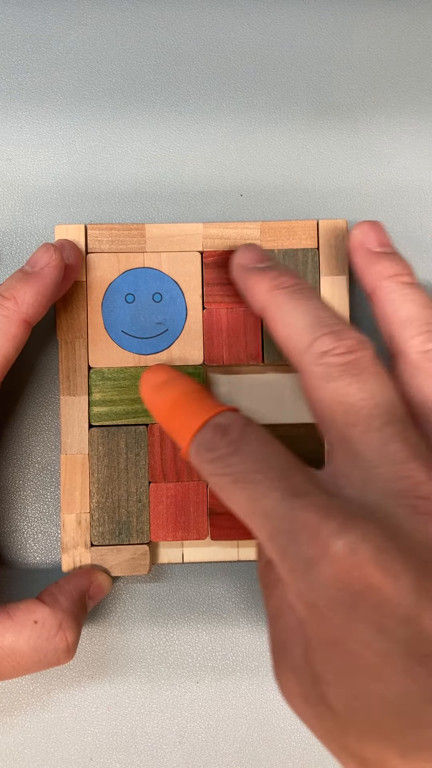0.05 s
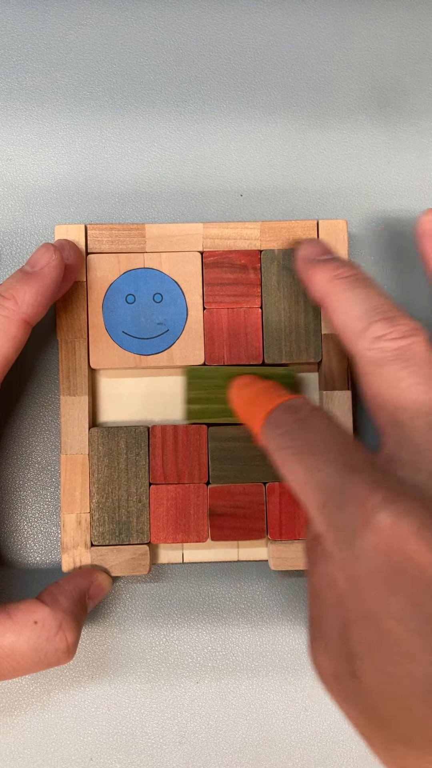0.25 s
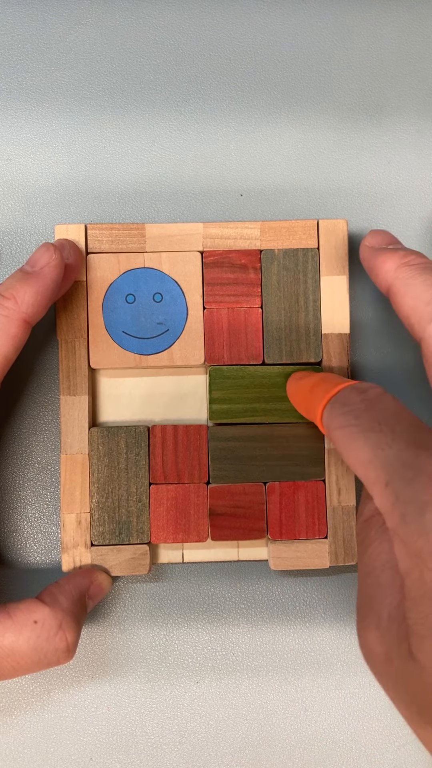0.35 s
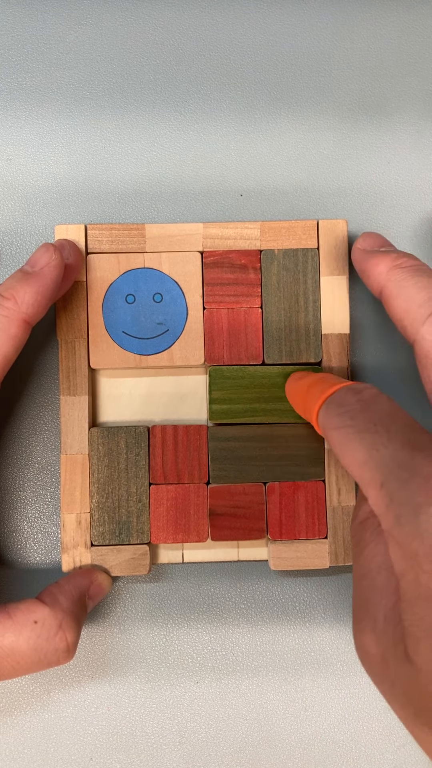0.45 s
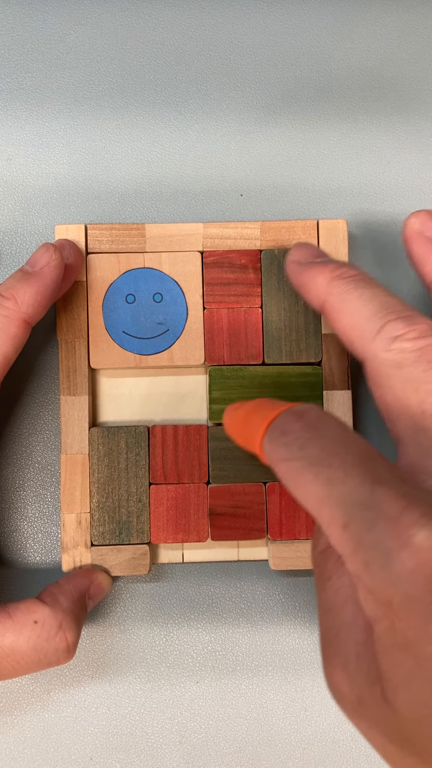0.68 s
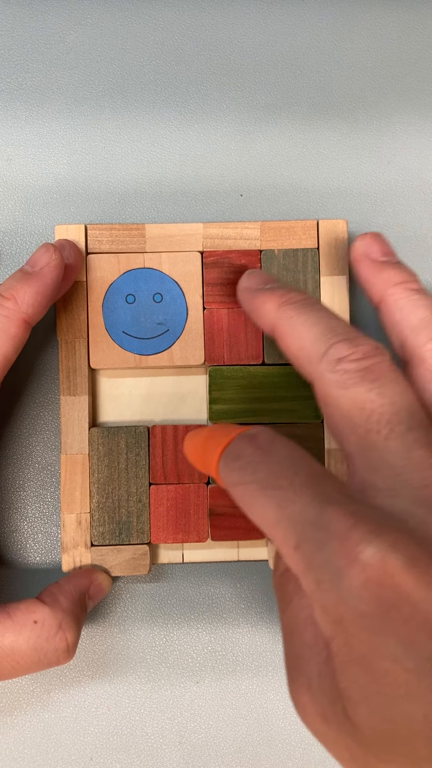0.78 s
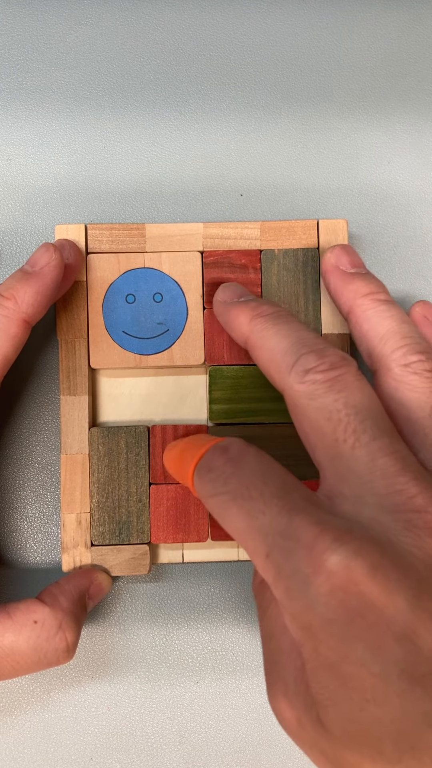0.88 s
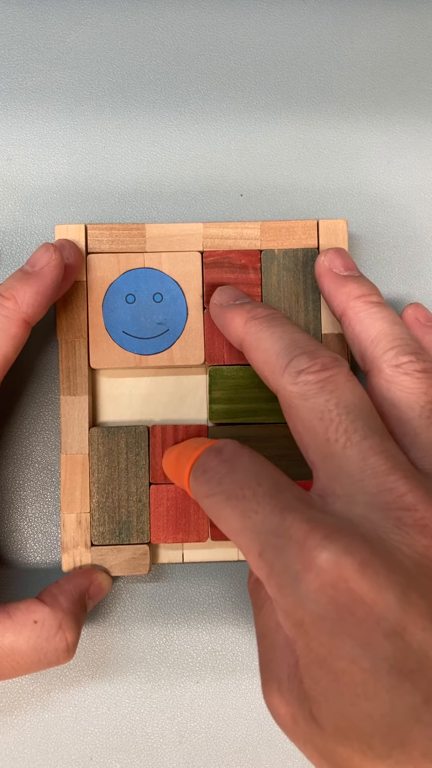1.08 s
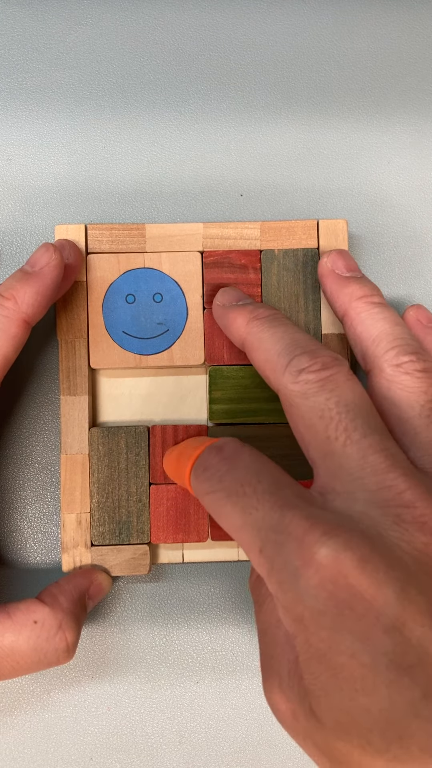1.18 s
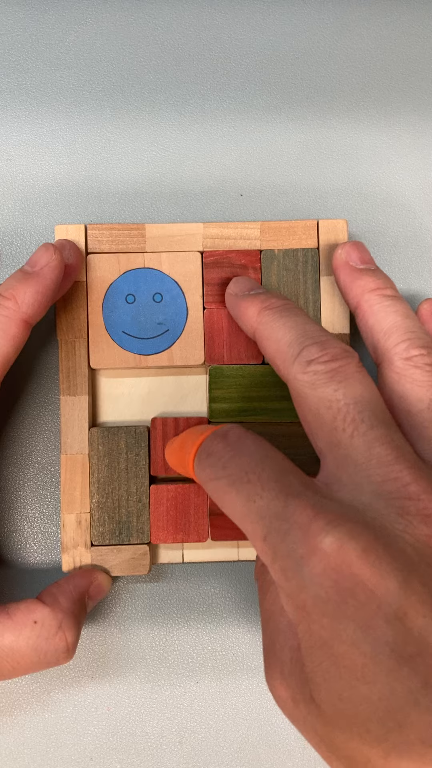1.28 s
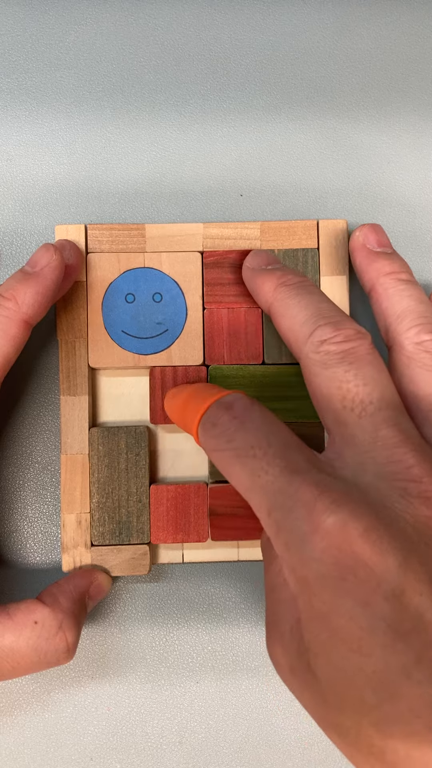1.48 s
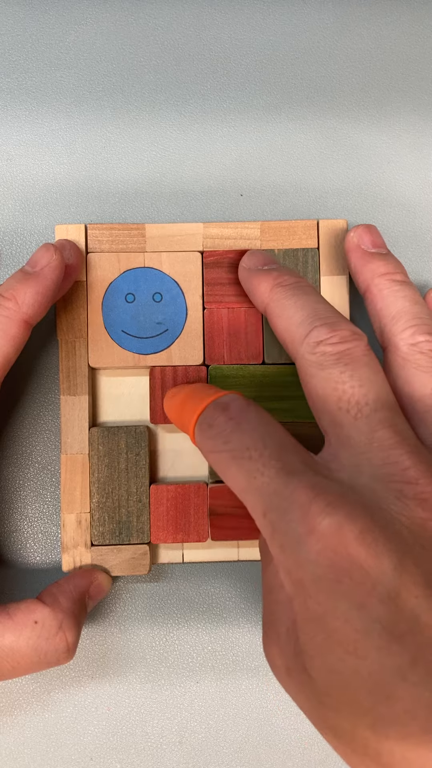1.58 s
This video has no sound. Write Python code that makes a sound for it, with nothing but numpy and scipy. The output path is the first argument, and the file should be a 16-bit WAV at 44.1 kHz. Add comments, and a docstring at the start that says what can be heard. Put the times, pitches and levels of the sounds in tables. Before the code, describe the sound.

Close to the microphone in a small room, a wooden puzzle block scrapes along its tray and clacks against the edge. After a pause with faint hand rustle, a second block slides and taps lightly against its neighbour.

```python
"""On a table in a small room, a finger slides two wooden blocks across a puzzle tray near two
microphone ports. Each block scrapes by stick-slip friction, countless tiny slips, and stops with a
clack as the impact excites its damped modes: the long one on the frame, the small one on a neighbour.
The room reverberates; beneath it all lie the noise of its air, a faint fan whine and a hand's rustle."""
import sys
import numpy as np
from scipy import signal
from scipy.fft import rfft, irfft, next_fast_len
from scipy.io import wavfile
from scipy.ndimage import map_coordinates

SR = 44100
rng = np.random.default_rng(int(sys.argv[2]) if len(sys.argv) > 2 else 0)


def put_to_file(sound):
    """Save the sound as 16-bit audio at rate SR, in the file named by the first command-line argument."""
    columns = np.atleast_2d(sound).T  # one column per channel
    safe = np.clip(columns, -1, 1)
    whole_steps = np.round(safe * 32767)
    wavfile.write(sys.argv[1], SR, whole_steps.astype(np.int16))


N = 72765

# spectra of the room air and the hand's rustle (frequency [Hz], relative level [dB])
AIR_SPECTRUM = [(20, -5), (45, 1.5), (70, 6), (120, 4), (200, -1), (300, -8), (550, -16.5), (800, -17),
                (1100, -20), (1400, -21), (2200, -23.5), (3000, -27), (5000, -27.5), (6500, -33),
                (8500, -27.5), (15000, -41.5)]
RUSTLE_SPECTRUM = [(200, -12.5), (800, 10), (2000, 1.5), (3000, -8.5), (5000, -14.5), (8000, -33.5),
                   (15000, -31)]
# likeness of the air noise at left and right (frequency [Hz], coherence [1])
AIR_COHERENCE = [(50, 1), (150, .7), (400, .3), (1500, .3), (8000, .3)]
# partials of the fan (frequency [Hz], level [dB])
FAN_PARTIALS = [(812, -90), (1023, -79), (1070, -78.5), (1123, -99)]
# course of the rustle as the hand moves (time [s], level [dB])
RUSTLE_ENVELOPE = [(0, -81), (.62, -82), (.82, -71.5), (1.05, -77.5), (1.25, -75), (1.65, -76.5)]
# modes of table, tray and both blocks (frequency [Hz], level [dB], decay time T60 [s])
TABLE_MODES = [(59.45, -49, .16), (119, -47.5, 0.13), (174, -58.5, .06)]
TRAY_MODES = [(197.4, -58.5, 0.035), (577.6, -63.5, 0.066)]
LONG_MODES = [(646, -13.5, 0.021), (999, -11, .012), (1545, -5, 0.019), (2110, -5, .01), (2710, -5, 0.0069),
              (3421, -12.5, 0.03), (4610, -10, .014), (5600, -7.5, 0.0021), (6800, -1, 0.0037),
              (8000, -8, 0.0054)]
SMALL_MODES = [(400, -32, .035), (602, -28, 0.045), (1155, -20, 0.023), (2370, -5, 0.0082),
               (2990, -1, 0.0075), (4450, -3, 0.0078), (5760, -4.5, 0.0027)]
# pushes: one for the long block, two nudges and a slide for the small one
# (start [s], end [s], level [dB], rise time [s], depth of the rise [dB])
LONG_PUSHES = [(.174, .311, -45.5, 0.071, 11.5)]
SMALL_PUSHES = [(1.236, 1.259, -65, 0.016, 5.5), (1.276, 1.299, -65, 0.005, 3.4),
                (1.334, 1.408, -48, 0.015, 15)]
# friction spectra of the sliding faces (frequency [Hz], relative level [dB])
LONG_GRAIN = [(100, -31.5), (400, -22), (600, -12), (1000, -9.5), (1550, -13.5), (2100, -0.5), (3200, -2),
              (4200, -5), (5700, 0), (6700, 2.5), (7800, -2), (9500, -3.5), (12000, -7), (15500, -12.5)]
SMALL_GRAIN = [(100, -26), (500, -36), (1000, -11.5), (1600, -15.5), (2000, 1.5), (2400, 3.5), (3100, -1),
               (4200, -9), (5900, 6.5), (7200, 0), (9000, -6.5), (11000, -5.5), (15500, -16)]
# contacts: long block on the frame (lead-in, two corners, rebound), small block on its neighbour
# (time [s], level [dB], low-pass cutoff [Hz])
LONG_CONTACTS = [(.3078, -37.5, 6000), (.3096, -42, 4000), (.3107, -20.5, 3840), (.3114, -20, 13000),
                 (.3199, -30, 3500)]
SMALL_CONTACTS = [(1.4058, -46.5, 9000), (1.4084, -33.5, 8900)]
# impact spectra, shared by rattle and snap (frequency [Hz], relative level [dB])
LONG_IMPACT_SPECTRUM = [(60, -21.5), (170, -4), (260, -11.5), (370, -8.5), (550, -7.5), (1000, -0.5),
                        (1550, 0.5), (2400, 0.5), (3300, -1.5), (4300, -6.5), (5700, 3), (7500, -4),
                        (10000, -14), (15000, -27.5)]
SMALL_IMPACT_SPECTRUM = [(100, -21), (380, 7), (750, -2), (1500, -2.5), (2400, 0), (3500, -6), (4700, -4.5),
                         (6500, -18), (10000, -8.5), (15000, -22)]
# phase between the ports (frequency [Hz], lead of the left [rad])
PORT_PHASE = [(0, 0), (600, -1), (1000, -.8), (2100, .45), (3400, .3), (4500, 1.8), (5600, 3.45),
              (7800, 5.55), (9200, 6.7), (10700, 8.6), (12500, 9.9), (14500, 12.2), (15750, 13)]
# balance between the ports (frequency [Hz], left minus right [dB])
PORT_BALANCE = [(500, 1), (1000, -3.5), (1500, -1.5), (2100, -11), (2800, -9), (3400, -6), (4400, -2),
                (5500, 0)]
# reverberation time (frequency [Hz], T60 [s])
ROOM_T60 = [(150, .35), (1000, .32), (4500, 0.29), (6500, .23), (14000, 0.46)]
# colour of the reflections (frequency [Hz], gain [dB])
ROOM_SPECTRUM = [(100, 2), (400, 5), (1000, 2.5), (1600, 2.5), (3000, 0), (4400, 4.5), (5900, -8.5),
                 (7500, -1.5), (9500, -9), (14000, -14)]

RING_SAMPLES = int(.25 * SR)  # length of an impulse response
RING_TIME = np.arange(RING_SAMPLES) / SR


def amp(db):
    """Amplitude ratio of a level in decibels."""
    return 10 ** (np.asarray(db) / 20)


def unit_rms(x):
    """Normalisation to rms 1."""
    return x / np.sqrt(np.mean(x ** 2) + 1e-20)


def along(points, hz):
    """Interpolation of (frequency, value) points on a logarithmic frequency axis."""
    knots_hz, values = np.transpose(points)
    return np.interp(np.log(hz + 1), np.log(knots_hz + 1), values)


def since(start_s):
    """Seconds elapsed since start_s, zero before."""
    return np.maximum(np.arange(N) / SR - start_s, 0)


def placed(x, start_s):
    """A short sound delayed to start_s in the scene."""
    out, i = np.zeros(x.shape[:-1] + (N,)), round(start_s * SR)
    out[..., i:i + x.shape[-1]] = x[..., :N - i]
    return out


def wobble(knots_per_s):
    """Smooth random modulation: a spline through Gaussian values."""
    knots = rng.standard_normal(int(N * knots_per_s / SR) + 4)
    return map_coordinates(knots, [np.arange(N) * knots_per_s / SR])


def filtered(x, response):
    """Linear filtering: the spectrum of x times a complex frequency response."""
    n = x.shape[-1]
    padded = next_fast_len(n + 2048, True)
    return irfft(rfft(x, padded) * response(np.fft.rfftfreq(padded, 1 / SR)), padded)[..., :n]


def coloured(x, spectrum):
    """Spectral shaping by (frequency [Hz], level [dB]) points, at rms 1."""
    return unit_rms(filtered(x, lambda hz: amp(along(spectrum, hz))))


def low_pass(ratio):
    """Two-pole Butterworth response; ratio is frequency over cutoff."""
    return 1 / (1 + np.sqrt(2) * 1j * ratio - ratio ** 2)


def ring(modes):
    """Modal superposition: a blow leaves damped sinusoids, here of alternating sign."""
    return sum((-1) ** k * amp(db - 60 * RING_TIME / t60) * np.sin(2 * np.pi * hz * RING_TIME)
               for k, (hz, db, t60) in enumerate(modes))


def room_air(level_db=-70):
    """Partially coherent noise: the two channels are most alike at long wavelengths."""
    def response(hz):
        angle = np.arccos(np.clip(along(AIR_COHERENCE, hz), -1, 1)) / 2
        return amp(along(AIR_SPECTRUM, hz)) * [np.cos(angle), np.sin(angle)]
    mid, side = filtered(rng.standard_normal((2, N)), response)
    return amp(level_db) * unit_rms(np.array([mid + side, mid - side]))


def fan_whine(waver_depth=.64, drift_hz=2.2):
    """Modulated tones: the partials drift together, and each wavers in amplitude and phase."""
    out = np.zeros((2, N))
    drift = drift_hz * wobble(20)
    for hz, db in FAN_PARTIALS:
        waver = 1 + waver_depth * (wobble(26) + 1j * np.array([wobble(22), wobble(22)]))
        carrier = np.exp(2j * np.pi * np.cumsum(hz + drift) / SR)
        out += np.sqrt(2) * amp(db) * np.real(waver * carrier)
    return out


def hand_rustle():
    """Amplitude-modulated noise: a soft rustle swells and fades as the hand moves."""
    level_db = np.interp(since(0), *np.transpose(RUSTLE_ENVELOPE))
    return coloured(rng.standard_normal((2, N)), RUSTLE_SPECTRUM) * amp(level_db)


def fingertip_touch(tick_s=.1385, tick_db=-68, tick_t60_s=.008, land_s=.1415, rise_s=.014):
    """Soft impact: a block ticks as it shifts under the fingertip; tray and table ring in their modes."""
    tick = coloured(rng.standard_normal(RING_SAMPLES),
                    [(500, -11.5), (4000, -12), (10500, -6.5), (15000, -10)])
    tick *= amp(tick_db - 60 * RING_TIME / tick_t60_s)
    thud = ring(TABLE_MODES) * (1 - np.exp(-RING_TIME / rise_s)) - ring(TRAY_MODES)
    return placed(tick, tick_s) + placed(thud, land_s)


def scrape(pushes, grain, slips_per_s=9000, scatter_db=1.5, judder_db=-.45,
           break_loose_s=.0011, stop_s=.0063, treble_hz=6000, treble_exponent=.35):
    """Stick-slip friction: dense tiny slips, louder and brighter as the block gathers speed."""
    slips = (rng.random(N) < slips_per_s / SR) * rng.standard_normal(N)
    slips *= amp(scatter_db * rng.standard_normal(N).clip(-2, 2))
    speed = np.zeros(N)
    for start, end, db, rise_s, depth_db in pushes:
        t = since(start)
        ramp = amp(db - depth_db * np.maximum(1 - t / rise_s, 0))
        speed += ramp * (1 - np.exp(-t / break_loose_s)) * np.exp(-since(end) / stop_s)
    rub = coloured(slips, grain)
    body = filtered(rub, lambda hz: 1 / (1 + (hz / treble_hz) ** 2) ** 2)
    treble = (rub - body) * (speed / speed.max()) ** treble_exponent
    return (body + treble) * speed * amp(judder_db * wobble(160))


def clack(contacts, modes, spectrum, rattle_db=-12, rattle_t60_s=.0277, bass_hz=483.3):
    """Impact excitation: each contact rings the block, jostles its neighbours and snaps into the room."""
    def radiation(hz):  # a small body radiates long wavelengths poorly
        return low_pass(hz / bass_hz) * -(hz / bass_hz) ** 2
    out, wood = np.zeros((2, N)), ring(modes)
    rattle_decay = amp(rattle_db - 60 * RING_TIME / rattle_t60_s)
    for time_s, db, cutoff_hz in contacts:
        rattle = coloured(rng.standard_normal(RING_SAMPLES), spectrum) * rattle_decay
        blow = rattle - wood
        snap = coloured(signal.unit_impulse(RING_SAMPLES, SR // 1000), spectrum) * blow.std()
        # each contact has its own cutoff, so it sounds dull or bright
        heard = filtered(ports(blow) + room(snap), lambda hz: low_pass(hz / cutoff_hz) * radiation(hz))
        out += amp(db) * placed(heard, time_s)
    return out


def ports(x):
    """Direct sound: it reaches the two ports with a phase and level that depend on frequency."""
    def response(hz):
        phase = np.interp(hz, *np.transpose(PORT_PHASE))
        left = np.exp(.5j * phase) * amp(along(PORT_BALANCE, hz) / 2)
        return np.array([left, 1 / left])
    return filtered(x, response)


def room(x, tail_db=-11, tail_rise_s=.008, early_db=-5, early_rise_s=.001, early_t60_s=.06):
    """Reverberation by convolution: early scatter from table and hands, then a decaying diffuse tail."""
    hz, frame_s, noise = signal.stft(rng.standard_normal((2, RING_SAMPLES)), SR, nperseg=256)
    decay = amp(-60 * frame_s / along(ROOM_T60, hz)[:, None])
    tail = signal.istft(noise * decay, SR, nperseg=256)[1]
    t = np.arange(tail.shape[1]) / SR
    tail *= 1 - np.exp(-t / tail_rise_s)
    early = rng.standard_normal(tail.shape) * amp(-60 * t / early_t60_s)
    early *= 1 - np.exp(-t / early_rise_s)
    tail *= amp(tail_db) / np.linalg.norm(tail[0])
    early *= amp(early_db) / np.linalg.norm(early[0])
    impulse_response = filtered(tail + early, lambda hz: amp(along(ROOM_SPECTRUM, hz)))
    return signal.fftconvolve(x[None], impulse_response, axes=1)[:, :len(x)]


def scene(lean_db=.77):
    """Superposition: direct and reflected sound of the blocks over a background that leans left."""
    slides = scrape(LONG_PUSHES, LONG_GRAIN) + scrape(SMALL_PUSHES, SMALL_GRAIN) + fingertip_touch()
    clacks = clack(LONG_CONTACTS, LONG_MODES, LONG_IMPACT_SPECTRUM)
    clacks += clack(SMALL_CONTACTS, SMALL_MODES, SMALL_IMPACT_SPECTRUM)
    blocks = ports(slides) + room(slides) + clacks
    background = room_air() + fan_whine() + hand_rustle()
    return blocks + background * amp([[lean_db], [-lean_db]])


def record(dry, top_hz=15750):
    """Band limiting: an ideal low-pass removes everything above top_hz."""
    return filtered(dry, lambda hz: hz < top_hz)


dry = scene()
out = record(dry)
put_to_file(out)
```